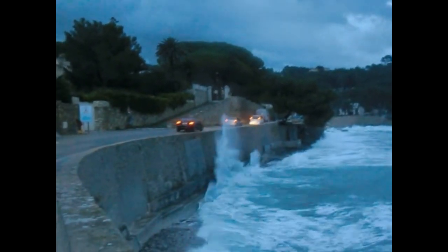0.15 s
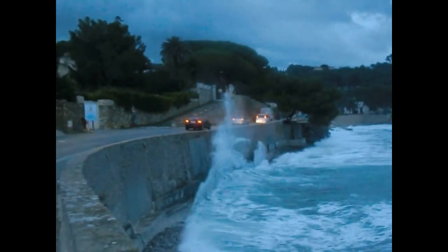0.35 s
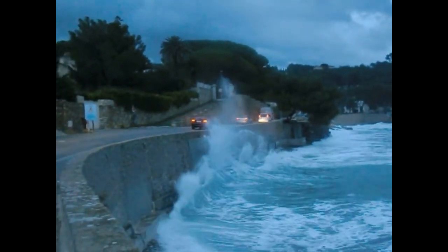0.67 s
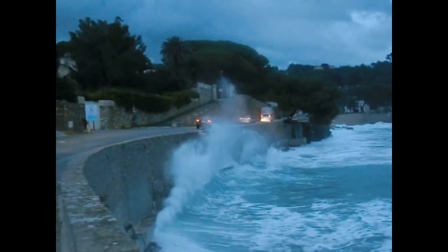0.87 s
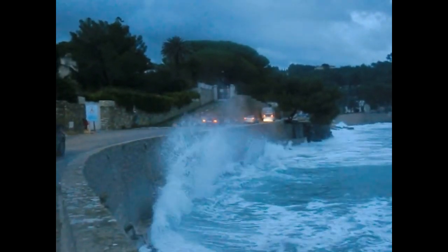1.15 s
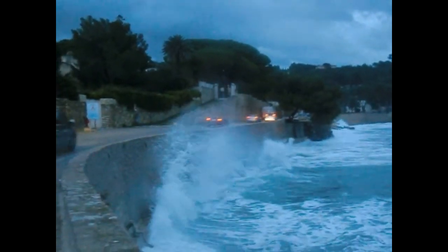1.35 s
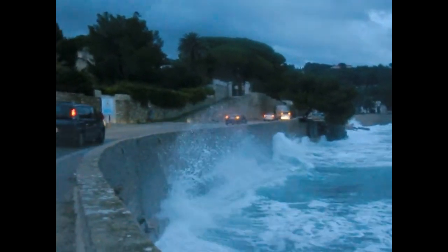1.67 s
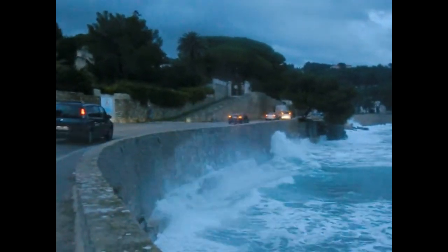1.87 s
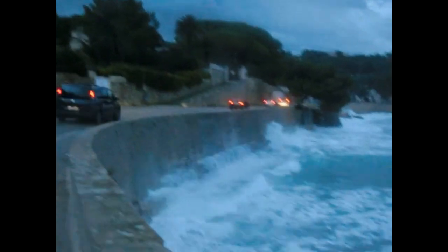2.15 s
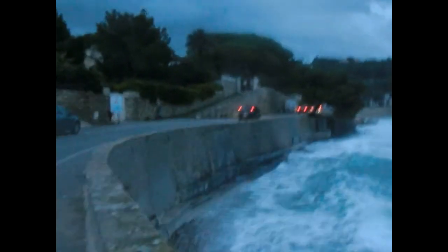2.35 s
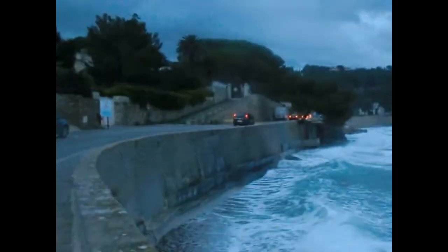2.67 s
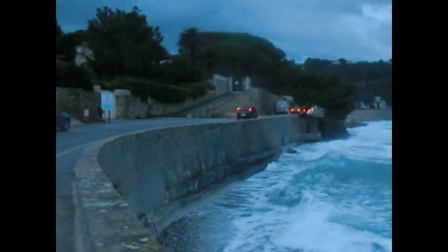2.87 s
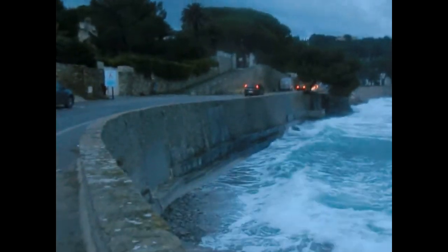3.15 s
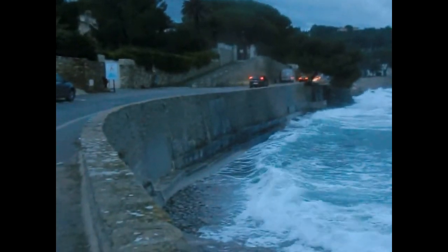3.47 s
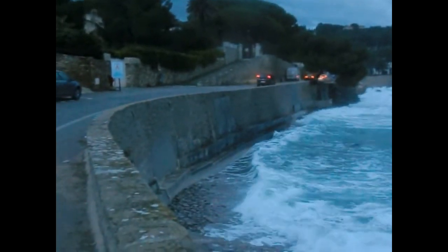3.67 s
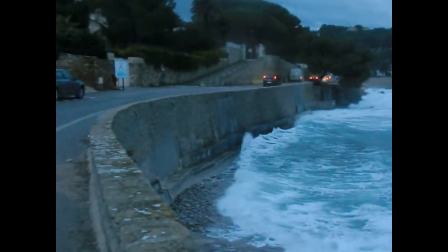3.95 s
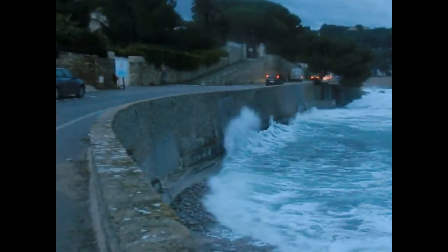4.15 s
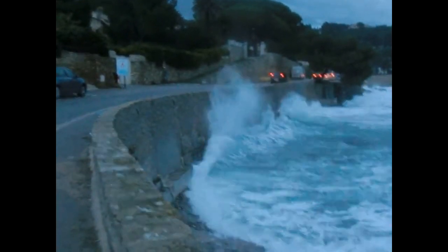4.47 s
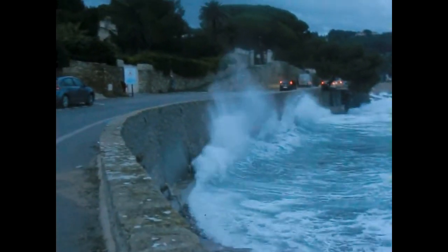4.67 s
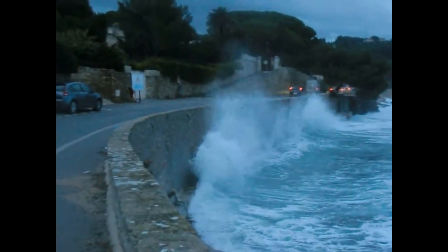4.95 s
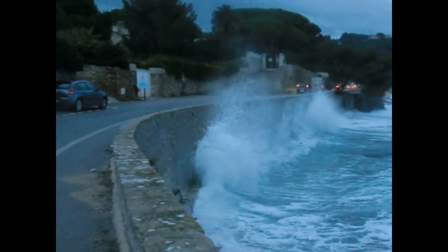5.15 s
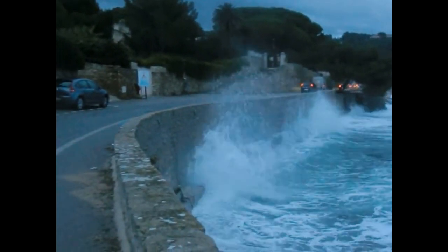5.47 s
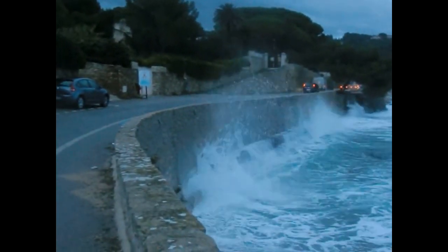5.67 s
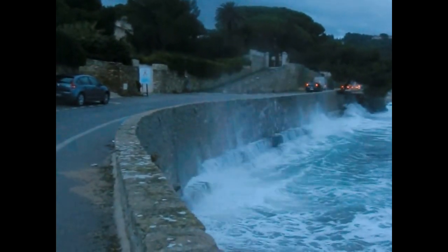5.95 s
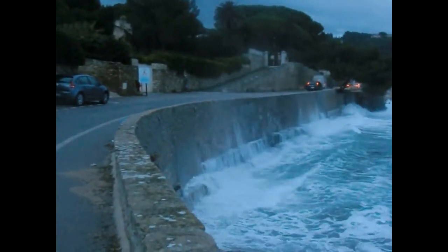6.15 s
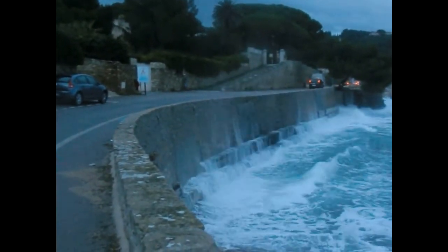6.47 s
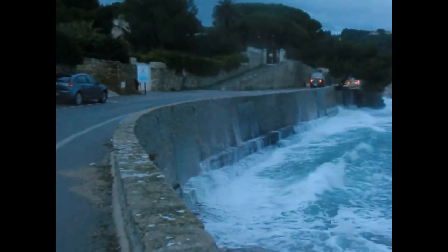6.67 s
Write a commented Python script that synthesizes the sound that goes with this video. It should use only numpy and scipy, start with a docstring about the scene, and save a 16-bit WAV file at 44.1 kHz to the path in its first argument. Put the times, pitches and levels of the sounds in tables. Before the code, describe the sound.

Close mono capture of rough waves at a coastal wall. Two light wave hits, then dense, overloaded wind buffeting from about one to two seconds. After a short silent cut, another wind burst, calmer churning, and a wave clap with lingering low boom. Scattered softer wind bumps follow, then hissing spray and a hollow rush of backwash.

```python
"""Surf churns against a stone sea wall under a restless wind: shaped noise for foam, roar and turbulence.
Waves slam the wall (ringing noise bands); puffs of wind and one slam thump a small mono microphone (pulses).
Late on, spray rains back as a bright hiss and water pours off the wall with a hollow rush (noise swells).
The strongest puffs hit a peak limiter, which pulls the surf down and lets it creep back.
A short silence separates two shots."""
import sys
import numpy as np
from scipy import signal
from scipy.io import wavfile
from scipy.ndimage import uniform_filter1d, minimum_filter1d

SR = 44100
rng = np.random.default_rng(int(sys.argv[2]) if len(sys.argv) > 2 else 0)


def voltage_ratio(level):
    """Linear amplitude factor for a level in decibels (scalar or array-like)."""
    return 10 ** (np.asarray(level, float) / 20)


def materialize(psi):
    """Save the field psi as 16-bit PCM at rate SR to the path in sys.argv[1].

    A 1-D psi becomes a single channel; in a 2-D psi each row is a channel.
    """
    bounded = np.clip(np.atleast_2d(psi).T, -1, 1)
    quanta = np.round(bounded * 32767).astype(np.int16)
    wavfile.write(sys.argv[1], SR, quanta)


N = 300629


def evened(x):
    """Scales to rms 1."""
    return x / np.sqrt(np.mean(x ** 2) + 1e-20)


def read_spectrum(points, hz):
    """Reads a spectrum on a log-frequency axis."""
    point_hz, point_db = np.transpose(points)
    return np.interp(np.log(hz + 1), np.log(point_hz + 1), point_db)


def curves(rows, t):
    """Joins the rows of a table by straight lines in time."""
    row_s, *columns = np.transpose(rows)
    return [np.interp(t, row_s, column) for column in columns]


def stft_grid(size):
    """Bin frequencies as a column and frame times of a short-time spectrum."""
    hz = np.fft.rfftfreq(size, 1 / SR)[:, None]
    frame_s = np.arange(4 * N // size + 5) * size / 4 / SR
    return hz, frame_s


def coloured(x, field_db, size):
    """Gives x the time-frequency shape field_db."""
    overlap = 3 * size // 4
    z = signal.stft(np.pad(x, (0, 2 * size)), nperseg=size, noverlap=overlap)[2]
    shaped = z[:, :field_db.shape[1]] * voltage_ratio(field_db)
    return signal.istft(shaped, nperseg=size, noverlap=overlap)[1][:N]


def patches(hz, t, bins, frames):
    """Random blobs in frequency and time, rms 1."""
    field = rng.standard_normal((len(t), len(hz))).T
    across_hz = uniform_filter1d(field, bins, 0)
    return evened(uniform_filter1d(across_hz, frames, 1))


def unit_db(spectrum_db, hz, lo_hz, hi_hz):
    """Offsets a spectrum so that white noise of rms 1 gives rms 1 between lo and hi."""
    in_band = (hz > lo_hz) * (hz < hi_hz)
    return spectrum_db - 10 * np.log10(np.mean(voltage_ratio(2 * spectrum_db) * in_band))


def band_db(hz, centre_hz, width_hz):
    """A noisy resonance of rms 1, 6 dB down at width_hz off its centre."""
    shape_db = -20 * np.log10(1 + ((hz - centre_hz) / width_hz) ** 2)
    return shape_db - 10 * np.log10(np.mean(voltage_ratio(2 * shape_db), 0))


def swell(peak_s, peak_db, centre_hz, spread_s, width_hz):
    """Noise in one broad resonance; its level is 10 dB down spread_s before and after the peak."""
    hz, t = stft_grid(size=2048)
    level_db = peak_db - 10 * ((t - peak_s) / spread_s) ** 2
    return coloured(rng.standard_normal(N), band_db(hz, centre_hz, width_hz) + level_db, size=2048)


# Surf course. Each row: time in seconds, strength in dB, spray brightness in dB (treble tilt),
# roar offset in dB against the strength.
SURF_COURSE = [(0.0, -36.5, -2.5, -2), (0.3, -36.5, -3, 2), (0.8, -33.5, -2.5, 2.5), (1.15, -34.5, -3, 1.5),
               (1.5, -32.5, -2, -2), (1.65, -27.5, -1, 1.5), (1.85, -27, -0.5, -5), (2.18, -29.5, -0.3, -2),
               (2.34, -31, -2.5, 1), (2.8, -31, -2.5, 1), (2.92, -27.5, -3.5, 1), (3.5, -30.5, -3.5, -2),
               (3.93, -34, -3.5, 0.5), (4.17, -33, -3, 0.5), (4.33, -33, -3.5, -0.5),
               (4.63, -33.5, -3.5, 3), (4.86, -36, -3, 1.5), (5.1, -37, -3, 1.5), (5.32, -34, -3.5, -5),
               (5.55, -31, -1.5, -0.5), (5.95, -28.5, -0.5, -12), (6.2, -31.5, -2.2, -6.5),
               (6.45, -33, -1, 1), (6.82, -34, -3.5, -8)]
# Foam and spray spectrum. Each row: frequency in Hz, relative density in dB.
FOAM_SPECTRUM = [(300, 3), (1000, 0), (1600, -2.5), (2100, -1), (2550, 0), (3000, -2.5), (4200, -1.5),
                 (6000, -4), (10000, -11), (13000, -18.5), (15600, -25.5)]
# Churning water spectrum. Each row: frequency in Hz, relative density in dB.
ROAR_SPECTRUM = [(60, -32), (200, 9), (350, 0.5), (560, 4.5), (800, 0.5), (1000, -4.5), (1300, 0),
                 (1600, -9), (3000, -34)]


def surf(patchy_db=0.26, flicker_db=0.44, churn_db=2.0):
    """Foam hiss and lower roar follow one strength; spray tilts the treble."""
    hz, t = stft_grid(size=512)
    strength_db, bright_db, roar_db = curves(SURF_COURSE, t)
    flicker = flicker_db * patches(hz[:1], t, bins=1, frames=8)  # all frequencies together
    tilt = np.clip(np.log2(hz / 4500 + 1e-3) / 1.03, -1, 2)
    hiss_db = unit_db(read_spectrum(FOAM_SPECTRUM, hz), hz, 2000, 8000) + bright_db * tilt
    hiss_db += patchy_db * patches(hz, t, bins=8, frames=20)
    body_db = unit_db(read_spectrum(ROAR_SPECTRUM, hz), hz, 400, 1500) + roar_db
    body_db += churn_db * patches(hz, t, bins=3, frames=16) + 0.3
    both_db = 10 * np.log10(voltage_ratio(2 * hiss_db) + voltage_ratio(2 * body_db))
    return coloured(rng.standard_normal(N), both_db + strength_db + flicker, size=512)


# Steady wind under the gusts. Each row: time in seconds, strength in dB, depth of the slowest eddies in dB,
# edge of the fastest eddies in dB.
STEADY_WIND = [(0.0, -24.5, -5.5, 8.5), (0.2, -31.5, 0, 0), (0.55, -25, -5.5, 5.5),
               (0.75, -26.5, -2, -11.5), (1.03, -28.5, 3, -1.5), (1.2, -14, -1, -7), (1.7, -14.5, 3.5, 4),
               (2.18, -17, 6.5, -2), (2.34, -30.5, -15, 0), (2.65, -26, 1, 4), (2.8, -30.5, 5, 3),
               (2.92, -21, 10, 3), (3.1, -14.5, -6, -11), (3.4, -23, -12, -15), (3.62, -22, -9, -8),
               (4.1, -28.5, 6, 8), (4.33, -20.5, -21, -2), (4.58, -33, 15.5, -3), (5.0, -26, -2, -4.5),
               (5.25, -27.5, -7, 9), (5.55, -22, -1, 4.5), (5.75, -27.5, -1.5, 9.5), (6.15, -25, -8, 7.5),
               (6.37, -30, -3, 6.5), (6.82, -24.5, -2, 8)]
# Gusts on the microphone. Each row: start in seconds, length in seconds, strength in dB, depth in dB,
# edge in dB.
WIND_GUSTS = [(1.052, 0.099, -9.5, -2, 6.5), (1.324, .07, -13, -2, 0), (1.464, .13, -12, -11, -1.5),
              (1.61, .11, -9.5, -6, -3), (1.89, 0.064, -12.5, -14, -8), (2.02, 0.046, -10, -5, -6),
              (2.837, 0.029, -9.5, 4, 3), (3.714, 0.11, -19, 10, 1), (3.889, 0.05, -15.5, 0, -2),
              (4.66, 0.038, -29.5, -8, -4), (4.812, 0.061, -27.5, -12, -5), (5.6, .09, -23, -12, 9),
              (5.824, 0.057, -22.5, -9, -11), (6.7, 0.027, -25, -4, -2)]


def airflow(t, rise_s=0.0051, fall_s=0.016):
    """Gusts rise, hold and drop over the steady wind; the strongest flow sets the colour."""
    steady_db, depth_db, edge_db = curves(STEADY_WIND, t)
    power = voltage_ratio(2 * steady_db)
    depth, edge = power * depth_db, power * edge_db
    for start_s, length_s, gust_db, gust_depth_db, gust_edge_db in WIND_GUSTS:
        rise = np.clip((t - start_s) / rise_s, 0, 1)
        fall = np.exp(-np.maximum(t - start_s - length_s, 0) / fall_s)
        gust = voltage_ratio(2 * gust_db) * (rise * fall) ** 2
        power = power + gust
        depth = depth + gust * gust_depth_db
        edge = edge + gust * gust_edge_db
    return 10 * np.log10(power), depth / power, edge / power


# Wind turbulence spectrum. Each row: frequency in Hz, relative density in dB.
BUFFET_SPECTRUM = [(15, -45), (25, -12), (70, 6), (160, 0), (220, 1), (340, -5.5), (470, -11), (800, -17),
                   (1300, -36.5), (2500, -67.5)]


def wind(lumpy_db=5.5, calm_db=-26, lump_s=0.01, reach=1.74):
    """Dense low turbulence; the stronger the gust, the lumpier it beats."""
    hz, t = stft_grid(size=1024)
    depth_db, edge_db = airflow(t)[1:]
    strength_db = airflow(np.arange(N) / SR)[0]
    gusty = np.clip((strength_db - calm_db) / 10, 0, 1)
    lumps = evened(signal.lfilter([1], [1, -np.exp(-1 / (lump_s * SR))], rng.standard_normal(N)))
    eddies = rng.standard_normal(N) * voltage_ratio(lumpy_db * gusty * np.clip(lumps, -3, 1.5))
    eddies /= np.sqrt(uniform_filter1d(eddies ** 2, size=6000))
    deep = np.clip(np.log2(150 / (hz + 1)), 0, 1)
    sharp = np.clip(np.log2((hz + 1) / 300), 0, 1)
    field_db = unit_db(read_spectrum(BUFFET_SPECTRUM, hz), hz, 25, 400)
    field_db = field_db + depth_db * deep + edge_db * sharp
    turbulence = coloured(eddies, field_db, size=1024)
    # no eddy presses much harder than its gust
    return voltage_ratio(strength_db) * reach * np.tanh(turbulence / reach)


# Waves slamming the wall. Each row: impact in seconds, clap level in dB, boom level in dB.
WALL_SLAMS = [(0.26, -29.5, -30), (0.56, -31.5, -27.5), (4.05, -29.5, -30), (4.228, -24, -17.5),
              (4.45, -31, -29)]
# Resonances of air trapped against the wall, boom first. Each row: centre in Hz, width in Hz,
# offset in dB on the clap or boom level, delay in seconds, t60 in seconds.
AIR_POCKET = [(172, 55, -0.5, 0.027, 1.2), (608, 140, 5, 0.00092, 0.43), (1330, 340, 0, 0.017, 0.25),
              (2400, 250, -5.5, .02, 0.13)]


def slams(rise_s=0.0069):
    """Trapped air rings noisily: a hollow clap, then a low boom that dies slowly."""
    hz, t = stft_grid(size=1024)
    now_s, out = np.arange(N) / SR, np.zeros(N)
    for k, (centre_hz, width_hz, offset_db, delay_s, t60_s) in enumerate(AIR_POCKET):
        ring_db = band_db(hz, centre_hz, width_hz) + 0 * t
        ring = coloured(rng.standard_normal(N), ring_db, size=1024)
        for impact_s, clap_db, boom_db in WALL_SLAMS:
            age_s = np.maximum(now_s - impact_s - delay_s, 0)
            level_db = (clap_db if k else boom_db) + offset_db - 60 * age_s / t60_s
            out += ring * voltage_ratio(level_db) * (1 - np.exp(-age_s / rise_s))
    return out


# Single thumps on the diaphragm: wind eddies, and at 4.266 s the thud of the wave slam.
# Each row: peak time in seconds, peak in dB, swing in Hz, snap in dB against the peak.
THUMPS = [(0.299, -13, 327, 2.5), (0.9897, -11, 192, -6), (1.0616, -2.5, 147, -4.5), (1.067, -4, 199, -5),
          (1.096, -5, 253, -5), (1.112, -8, 149, -10), (1.129, -1, 326, -16), (1.1442, -7, 292, -13),
          (1.153, -1.5, 404, -6.5), (1.2015, -3.5, 315, -26), (1.2973, -4.5, 86, -23),
          (1.3477, -3, 235, -28), (1.3945, -11, 148, -23), (1.4188, -9, 183, -24), (1.4735, -2, 178, -32),
          (1.5034, -3.5, 438, -21), (1.529, -13.5, 620, 3.5), (1.5394, 0.5, 120, -20), (1.6, -3, 104, -9),
          (1.624, 1, 258, -5.5), (1.644, -1, 400, -3.5), (1.6491, 1.5, 234, -7), (1.6717, -2, 339, -12),
          (1.7, -2, 108, -28), (1.715, 4, 280, -4.5), (1.726, -8, 380, -15), (1.763, 5, 247, -16),
          (1.876, -3, 452, -7), (1.91, 1, 176, -11), (1.966, 1, 146, -14), (2.0522, -3, 115, -27),
          (2.8457, -9.5, 151, -7.5), (2.852, -2.5, 250, -10), (2.8685, -2, 280, -3),
          (2.9823, -1.5, 347, -18), (3.7593, -15, 120, -20), (3.799, -14, 181, -28),
          (3.8153, -8.5, 108, -23), (3.8497, -8, 82, -18), (3.8985, -12, 90, -22), (3.9313, -6, 210, -8),
          (4.0145, -6.5, 134, -26), (4.266, -6, 160, -13.5), (4.846, -21, 103, -25), (4.9317, -7, 142, -18),
          (4.95, -12.5, 105, -25), (5.3736, -11, 200, -15), (5.556, -10.5, 216, -16), (5.61, -7, 183, -20),
          (5.626, -8, 206, -21), (5.6851, -6.5, 210, -26), (6.105, -21, 75, -25), (6.7011, -13, 175, -14)]


def thumps(cycles=1.09, snap_hz=350, snap_follows=1.34, snap_cycles=0.62):
    """Each pushes the diaphragm, snaps across its peak and swings back; also gives the wind share left."""
    half = 2000
    t = np.arange(-half, half) / SR
    out, left = np.zeros(N + SR), np.ones(N + SR)
    signs = rng.choice([-1., 1.], len(THUMPS))
    for (peak_s, peak_db, hz, snap_db), sign in zip(THUMPS, signs):
        spread_s = np.where(t < 0, .3, .45) * cycles / hz  # steep front, longer swing back
        shape = np.exp(-(t / spread_s) ** 2)
        turns = (snap_hz + snap_follows * hz) * t  # faster swings snap higher
        snap = np.sin(2 * np.pi * turns) * np.exp(-(turns / snap_cycles) ** 2)
        push = np.cos(2 * np.pi * hz * t) * shape
        start = round(peak_s * SR) - half
        out[start:start + 2 * half] += sign * voltage_ratio(peak_db) * (push + voltage_ratio(snap_db) * snap)
        left[start:start + 2 * half] *= 1 - np.sqrt(shape)
    return out[:N], left[:N]


def sprayfall():
    """Spray of the burst wave rains back on the foam; countless drops merge into a bright hiss."""
    return swell(peak_s=5.69, peak_db=-36.5, centre_hz=4300, spread_s=0.44, width_hz=1600)


def backwash():
    """Water pours back off the wall; the gap between wave and wall gives a hollow rush."""
    return swell(peak_s=6.235, peak_db=-28.5, centre_hz=550, spread_s=0.43, width_hz=105)


def scene():
    """One microphone feeds both channels; thumps displace the turbulence."""
    pushes, left = thumps()
    mono = surf() + backwash() + sprayfall() + slams() + wind() * left + pushes
    return np.array([mono, mono])


def limited(x, ceiling_db=-7.1, recovery_db_per_s=9.5):
    """Peaks over the ceiling cut the gain at once; it recovers at a steady pace."""
    climb_db = np.arange(x.shape[1]) * recovery_db_per_s / SR
    over_db = 20 * np.log10(abs(x[0]) + 1e-9) - ceiling_db
    cut_db = np.maximum(np.maximum.accumulate(over_db + climb_db) - climb_db, 0)
    early_db = -minimum_filter1d(-cut_db, size=129)  # looks a millisecond and a half ahead
    return x / voltage_ratio(uniform_filter1d(early_db, size=65))


def roll_off(x):
    """The treble ends steeply here."""
    return signal.sosfilt(signal.butter(12, 15730, fs=SR, output="sos"), x)


# Silence between the shots: start in seconds, end in seconds.
SILENCE_S = 2.1855, 2.334


def record(dry):
    """Each shot passes the limiter on its own; silence lies between them."""
    end, start = (round(s * SR) for s in SILENCE_S)
    mix = np.zeros_like(dry)
    mix[:, :end] = limited(dry[:, :end])
    mix[:, start:] = limited(dry[:, start:])
    return roll_off(mix)


dry = scene()
out = record(dry)
materialize(out)
```